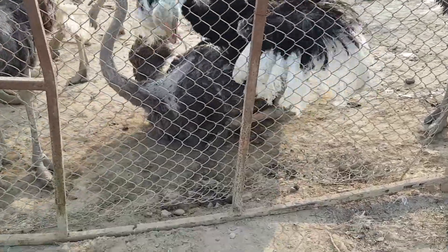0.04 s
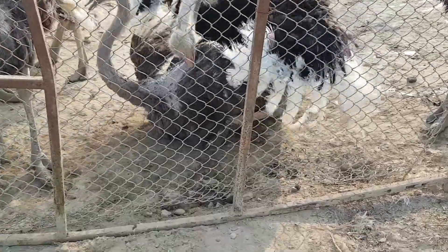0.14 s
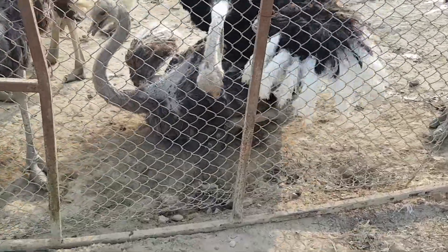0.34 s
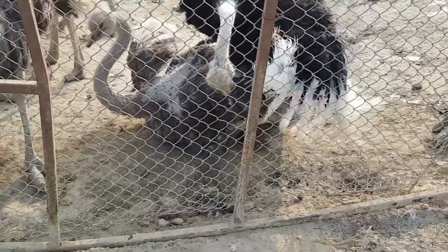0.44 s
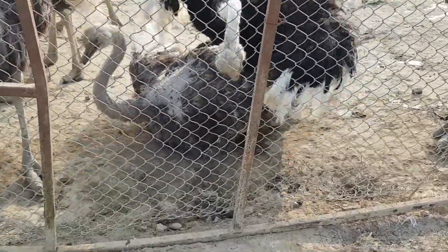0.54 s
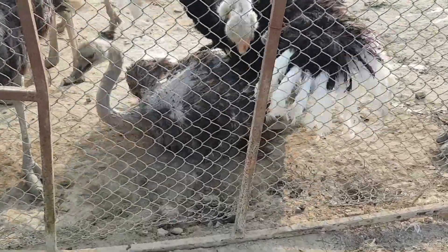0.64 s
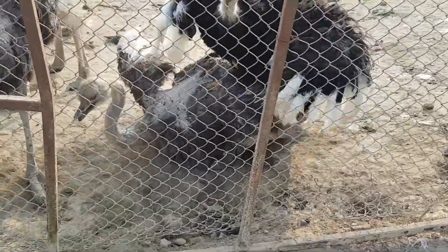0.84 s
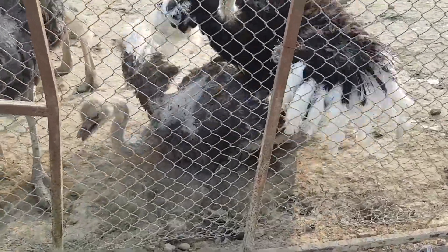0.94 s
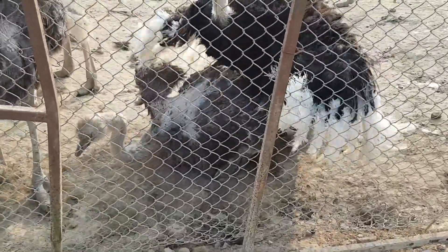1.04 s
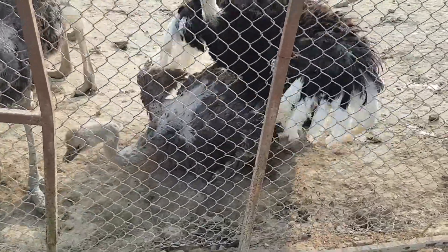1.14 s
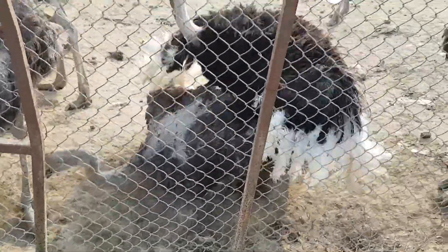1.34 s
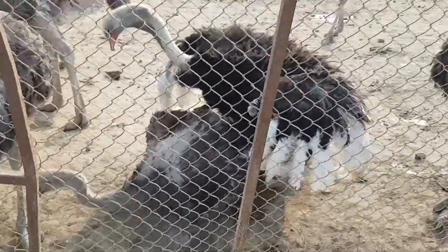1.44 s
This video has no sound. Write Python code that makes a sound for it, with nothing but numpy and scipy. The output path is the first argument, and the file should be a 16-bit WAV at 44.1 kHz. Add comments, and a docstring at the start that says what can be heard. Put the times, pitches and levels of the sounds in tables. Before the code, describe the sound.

Close by in an outdoor pen, an ostrich lets out a single deep, raspy groan that rises slightly, then falls away. Light rustles and scuffs follow, with soft, evenly spaced knocks and a far rumble and hiss throughout.

```python
"""An ostrich gives one low groan in a dry outdoor pen, close to a stereo pair of microphones.
Slow pulses from a valve in its throat boom in the inflated neck, each with a short rasp, and sink to a
slack rattle as the air runs out. Dull knocks repeat evenly, feathers rustle to the right, and feet pad
and scuff on the dry dirt. A steady far rumble, drone and hiss lie underneath."""
import sys
import numpy as np
from scipy import signal
from scipy.fft import rfft, irfft
from scipy.io import wavfile
from scipy.ndimage import uniform_filter1d

SR = 44100
rng = np.random.default_rng(int(sys.argv[2]) if len(sys.argv) > 2 else 0)


def inscribe(sig):
    """Save sig as 16-bit PCM at rate SR to the path in sys.argv[1].

    A 1-D sig is mono; a 2-D sig holds one channel per row.
    Samples are clipped to [-1, 1] before scaling.
    """
    pcm = np.round(np.clip(np.atleast_2d(sig).T, -1, 1) * 32767)
    wavfile.write(sys.argv[1], SR, pcm.astype(np.int16))


N = 66150
TIME = np.arange(N) / SR
FFT_SIZE = 2 * N
FREQ = np.maximum(np.arange(N + 1) * SR / FFT_SIZE, 1)

GROAN_START_S, GROAN_END_S, GROAN_FADE_S = .2064, .905, .0028
# pulse rate of the throat valve: (time [s], rate [Hz])
GROAN_PITCH = [(.2, 66), (.25, 76), (.298, 83.8), (.335, 85.6), (.38, 85.7), (.415, 87.9), (.47, 88.7),
               (.504, 90.4), (.56, 85.8), (.61, 79), (.658, 70.3), (.706, 62), (.757, 55.6), (.81, 51.5),
               (.9, 45)]
# effort of the call: (time [s], boom level [dB], rasp level [dB])
GROAN_EFFORT = [(.21, -37, -51), (.25, -31.5, -48), (.31, -27, -44.5), (.39, -27, -44), (.5, -25.5, -41.5),
                (.57, -28.5, -43.5), (.63, -31, -48.5), (.69, -34, -50), (.77, -33.5, -53.5),
                (.83, -37, -65), (.89, -49, -86)]
def groan(jitter_s=.000025, spread_db=.5, echo_db=-5):
    """Near the middle of the pair, one pulse train drives the neck's boom and the throat's rasp."""
    hz = over_time(GROAN_PITCH)
    effort_times, *levels = np.transpose(GROAN_EFFORT)
    boom_db, rasp_db = [np.interp(TIME, effort_times, db) for db in levels]
    cycles = np.cumsum(hz * (TIME >= GROAN_START_S)) / SR
    turns = np.arange(np.interp(GROAN_END_S, TIME, cycles))
    late, loud = rng.standard_normal((2, 128))[:, :len(turns)]
    starts = np.maximum(np.interp(turns, cycles, TIME), GROAN_START_S) + jitter_s * late
    pulses = clicks(starts, from_db(spread_db * loud))
    neck = boom(pulses) * from_db(boom_db) * pan(-.8)
    throat = rasp(pulses, starts) * from_db(rasp_db)
    echo = from_db(echo_db) * pen_echo(highpass(throat, 1000))
    gate = np.clip(np.minimum(TIME - GROAN_START_S, GROAN_END_S - TIME) / GROAN_FADE_S, 0, 1)
    return gate * (neck + lean_right(throat + echo))


# resonances of the neck, taut and slack: (frequency [Hz], gain [dB])
TAUT_NECK_SPECTRUM = [(30, -54), (70, -7), (88, 0), (140, -4), (175, 4.5), (230, -26.5), (268, -17),
                      (320, -11.5), (355, -18), (440, -18.5), (540, -27), (900, -47.5), (3000, -105.5)]
SLACK_NECK_SPECTRUM = [(30, -56), (55, -5.5), (110, -13.5), (155, 12), (195, -5.5), (228, -4), (285, 3),
                       (350, -13.5), (450, -37.5), (640, -11.5), (850, -27), (1300, -60), (3000, -65)]
def boom(pulses, swell_at_s=.575, swell_width_s=.068, swell_hz=321, swell_db=6):
    """The inflated neck rings with each pulse; an upper resonance swells while the pitch sinks."""
    neck = taut_to_slack(pulses, TAUT_NECK_SPECTRUM, SLACK_NECK_SPECTRUM)
    swell = from_db(swell_db) * np.exp(-((TIME - swell_at_s) / swell_width_s) ** 2)
    upper = signal.lfilter(*signal.iirpeak(swell_hz, Q=2.4, fs=SR), neck)
    return evened(neck + swell * upper)


# the valve opens, flutters, slaps shut and bounces: (delay before sag [cycles], level [dB])
VALVE_SLAPS = [(0, -2), (.14, -8), (.187, 0), (.29, -9)]
# colour of the rasp, neck taut and slack: (frequency [Hz], gain [dB])
TAUT_RASP_SPECTRUM = [(200, -64), (470, -1), (600, 5), (730, 6.5), (870, 5.5), (1020, 9), (1220, 0.5),
                      (1450, 2.5), (1820, 3), (2100, 1), (2400, -5.5), (2850, -3.5), (3100, -18),
                      (3600, -12.5), (4400, -19.5), (5400, -34), (12000, -44)]
SLACK_RASP_SPECTRUM = [(200, -37), (470, -11), (640, 12.5), (1000, 1), (1350, 0), (1850, 5), (2500, -3.5),
                       (3400, -23), (6000, -30), (12000, -43)]
SAG_FROM_S, SAG_S, SAG_SHARE = .51, .12, .14
SLAP_JITTER_S, SLACK_JITTER_S, SLAP_SPREAD_DB, SLAP_WANDER = .000015, .00025, 1.5, .012
def rasp(pulses, starts, air_db=-11, slack_air_db=10, air_decay_s=.004):
    """Uneven slaps and a bright puff of air in each cycle, looser and breathier as the neck slackens."""
    # past the peak the valve stays open longer in each cycle, so the rasp's resonances sink
    sag = 1 + SAG_SHARE * np.clip((starts - SAG_FROM_S) / SAG_S, 0, 1)
    span_s = sag / np.interp(starts, *np.transpose(GROAN_PITCH))
    jitter_s = SLAP_JITTER_S + SLACK_JITTER_S * slackness(starts)
    slaps = 0
    for share, db in VALVE_SLAPS:
        late, loud, slow = rng.standard_normal((3, 128))[:, :len(starts)]
        wander = SLAP_WANDER * rms_one(uniform_filter1d(slow, size=9))
        times = starts + share * (1 + wander) * span_s + jitter_s * late
        slaps = slaps + clicks(times, from_db(db + SLAP_SPREAD_DB * loud))
    puffs = signal.lfilter([1], [1, -np.exp(-1 / (air_decay_s * SR))], pulses)
    air = rms_one(highpass(puffs * rng.standard_normal(N), 1400))
    source = rms_one(slaps) + air * from_db(air_db + slack_air_db * slackness(TIME))
    return evened(taut_to_slack(source, TAUT_RASP_SPECTRUM, SLACK_RASP_SPECTRUM))


def slackness(t, from_s=.647, by_s=.701):
    """0 while the neck is taut, 1 once it is slack."""
    return np.clip((t - from_s) / (by_s - from_s), 0, 1)


def taut_to_slack(x, taut_spectrum, slack_spectrum):
    """The taut neck's colour fades into the slack neck's."""
    slack = slackness(TIME)
    return (1 - slack) * evened(colour(x, taut_spectrum)) + slack * evened(colour(x, slack_spectrum))


def pen_echo(x, t60_s=.08):
    """Short scatter from the ground, fence and birds reaches both microphones."""
    tail = stereo_noise() * from_db(-60 * TIME / t60_s)
    return signal.fftconvolve(x[None], rms_one(tail) / np.sqrt(N), axes=1)[:, :N]


# dull blows: (time [s], level [dB], brightness [dB per octave])
KNOCK_BLOWS = [(0.1748, -33, -3.5), (0.4615, -31, 0.5), (0.7569, -31, -0.5), (1.0451, -32, 0),
               (1.3236, -31, 1)]
# modes of the struck body: (frequency [Hz], gain [dB], t60 [s])
BODY_MODES = [(125, -12, 0.058), (363, -1.5, 0.034), (637, 2, 0.018), (748, -1, 0.029)]
def knocks(ping_db=-26):
    """Soft blows on a hollow, heavily damped body, each leaving a faint high ring."""
    times, db, brightness = np.transpose(KNOCK_BLOWS)
    body = 0
    for hz, mode_db, t60_s in BODY_MODES:
        tilt_db = brightness * np.log2(hz / BODY_MODES[1][0])
        body = body + ring(clicks(times, from_db(db + mode_db + tilt_db)), hz, t60_s)
    ping = ring(clicks(times, from_db(db + ping_db)), hz=4460, t60_s=.066)
    return (lowpass(body, 800, order=4) + ping) * pan(-1.5)


# steps in the pen: (time [s], level [dB], pitch [Hz])
FOOTFALLS = [(.016, -40.5, 284), (0.095, -40, 315), (0.179, -30.5, 189), (.922, -44, 570),
             (1.229, -38.5, 277), (1.358, -42, 196)]
def footfalls():
    """Padded feet press on the dirt, each with a short low ring, alike in both microphones."""
    steps = sum(ring(clicks([s], from_db(db)), hz, t60_s=.037) for s, db, hz in FOOTFALLS)
    return lowpass(steps, 600)


# strokes of feathers: (peak time [s], rise [s], fall [s], level [dB])
FEATHER_STROKES = [(.26, 0.073, 0.13, -60.5), (.64, 0.09, 0.04, -56.5), (1.235, 0.057, 0.053, -53),
                   (1.26, 0.0092, 0.01, -63), (1.42, 0.16, 0.15, -57.5)]
# their colour: (frequency [Hz], gain [dB])
FEATHER_SPECTRUM = [(500, -21), (1400, -0.5), (2600, -5), (4000, -1.5), (5500, -6.5), (7800, -10.5),
                    (9300, -27.5), (13000, -21.5), (16000, -27.5)]
def feathers():
    """Feathers rub over each other in soft rustles."""
    return friction(FEATHER_STROKES, FEATHER_SPECTRUM)


# dry snaps: (time [s], level [dB])
SNAPS = [(1.088, -48), (1.178, -37.5)]
# their colour: (frequency [Hz], gain [dB])
SNAP_SPECTRUM = [(200, -13), (1500, 19), (5000, 13.5), (8000, -18), (15000, -15)]
def ticks(decay_s=.00095):
    """Small dry snaps, each a very short burst of noise."""
    level = sum(from_db(db) * (TIME >= s) * np.exp(-np.abs(TIME - s) / decay_s) for s, db in SNAPS)
    return level * rms_one(colour(stereo_noise(), SNAP_SPECTRUM))


# sprays and scuffs on the pen floor: (peak time [s], rise [s], fall [s], level [dB])
GRIT_SPRAYS = [(.64, 0.088, 0.048, -65.5), (.825, 0.0079, 0.022, -63), (.924, .002, 0.0027, -58),
               (1.3, 0.039, 0.15, -61.5), (1.365, 0.018, 0.011, -61), (1.48, 0.086, .06, -65)]
DIRT_SCUFFS = [(.195, 0.018, 0.022, -48), (.945, 0.014, 0.018, -51), (1.087, 0.014, 0.0042, -51.5),
               (1.235, 0.013, 0.012, -60.5), (1.358, 0.011, 0.012, -62), (1.4, 0.13, 0.095, -55)]
# their colours: (frequency [Hz], gain [dB])
GRIT_SPECTRUM = [(3000, -22), (7000, -9), (10000, -4.5), (13000, 0.5), (16000, 1)]
DIRT_SPECTRUM = [(50, -12), (100, -8), (300, 8), (500, 8), (1300, 1), (2100, 1.5), (2800, -5.5),
                 (6000, -37)]
def dry_ground():
    """Fine grit sprays with a hiss, and scuffed dirt scrapes lower down."""
    return friction(GRIT_SPRAYS, GRIT_SPECTRUM) + friction(DIRT_SCUFFS, DIRT_SPECTRUM)


def friction(strokes, spectrum, grains_per_s=9000, spread_db=.5):
    """Dense tiny contacts that swell and fade with each stroke."""
    sizes = from_db(spread_db * np.minimum(rng.exponential(1, (2, N)), 6))
    signs = rng.choice([-1, 1], (2, N))
    grains = sizes * signs * (rng.random((2, N)) < grains_per_s / SR)
    level = sum(from_db(db) * np.exp(-((TIME - s) / np.where(TIME < s, rise, fall)) ** 2)
                for s, rise, fall, db in strokes)
    return level * rms_one(colour(microphone_pair(grains), spectrum))


# far noise around the pen: (frequency [Hz], gain [dB])
OUTDOOR_SPECTRUM = [(15, -45), (32, -38.5), (45, 11.5), (62, -17.5), (90, 3), (130, -5.5), (195, -1.5),
                    (290, -8), (400, -15), (680, -14), (1000, -17), (1400, -16.5), (2200, -15),
                    (3100, -23.5), (4200, -26), (5600, -33), (7700, -23), (9200, -42.5), (13000, -39),
                    (16000, -40.5)]
# its strength at the microphones: (time [s], level [dB])
OUTDOOR_LEVEL = [(0, -46), (.15, -46.5), (.88, -46), (1.0, -48), (1.14, -47.5), (1.25, -46), (1.5, -46)]
def background(drone_hz=45.7, waver_hz=.86, drone_db=-57.5):
    """Far outdoor rumble and hiss, brighter on the right, over a low wavering drone."""
    noise = rms_one(lean_right(colour(stereo_noise(), OUTDOOR_SPECTRUM)))
    waver = np.interp(TIME, np.linspace(0, N / SR, num=10), rng.standard_normal(10))
    drone = rms_one(np.sin(2 * np.pi * np.cumsum(drone_hz + waver_hz * waver) / SR))
    return noise * from_db(over_time(OUTDOOR_LEVEL)) + from_db(drone_db) * drone


# how alike the two microphones sound: (frequency [Hz], likeness [ratio, capped at 1])
MIC_LIKENESS = [(100, 1), (400, 0.5), (900, 1.1), (2000, 0.7), (4000, 0.26)]
def microphone_pair(pair):
    """Mix two unrelated signals so that they are alike in the bass and apart in the treble."""
    alike = np.clip(over_hz(MIC_LIKENESS), 0, 1)
    mid, side = rfft(pair, FFT_SIZE)
    return irfft(np.sqrt(1 + alike) * mid + np.sqrt(1 - alike) * side * [[1], [-1]])[:, :N]


def stereo_noise():
    """White noise across both microphones."""
    return microphone_pair(rng.standard_normal((2, N)))


# balance of the microphones: (frequency [Hz], left minus right [dB])
MIC_BALANCE = [(100, 0.5), (1000, -2.1), (2500, -3.5), (4500, -3.5), (8000, -7.5), (12000, 2)]
def lean_right(pair):
    """Most of the treble is louder in the right microphone."""
    return irfft(rfft(pair, FFT_SIZE) * from_db(over_hz(MIC_BALANCE) / 2 * [[1], [-1]]))[:, :N]


def from_left(pair, delay_s=.00021):
    """The sound reaches the right microphone a little later."""
    return np.array([pair[0], np.interp(TIME - delay_s, TIME, pair[1])])


def pan(db):
    """Microphone gains for a level difference, left minus right."""
    return from_db([[db / 2], [-db / 2]])


def from_db(db):
    """Decibels to gain."""
    return 10 ** (np.asarray(db) / 20)


def rms_one(x):
    """Scale to rms 1."""
    return x / np.sqrt(np.mean(x ** 2) + 1e-20)


def evened(x):
    """Hold the level at rms 1 over a few pulses."""
    power = x ** 2
    for _ in range(3):
        power = uniform_filter1d(power, size=1100)
    return x / np.sqrt(np.abs(power) + power.max() / 1000)


def over_time(points):
    """Read a table of (time [s], value) at every sample."""
    return np.interp(TIME, *np.transpose(points))


def over_hz(points):
    """Read a table of (frequency [Hz], value) at every frequency."""
    hz, value = np.transpose(points)
    return np.interp(np.log(FREQ), np.log(hz), value)


def colour(x, spectrum):
    """Causal (minimum-phase) filter with the given spectrum."""
    cepstrum = irfft(np.log(from_db(over_hz(spectrum))))
    cepstrum[1:N] *= 2
    cepstrum[N + 1:] = 0
    return irfft(rfft(x, FFT_SIZE) * np.exp(rfft(cepstrum)))[..., :N]


def clicks(times, gains):
    """Impulses at the given times, shared between neighbouring samples."""
    out, at = np.zeros(N), np.clip(np.asarray(times) * SR, 0, N - 2)
    np.add.at(out, at.astype(int), gains * (1 - at % 1))
    np.add.at(out, at.astype(int) + 1, gains * (at % 1))
    return out


def ring(x, hz, t60_s):
    """A unit click sets a sine of height 1 ringing."""
    radius, angle = from_db(-60 / (t60_s * SR)), 2 * np.pi * hz / SR
    return signal.lfilter([0, np.sin(angle)], [1, -2 * radius * np.cos(angle), radius ** 2], x + 1e-18)


def highpass(x, hz):
    """Keep the treble."""
    return signal.sosfilt(signal.butter(2, hz, "high", fs=SR, output="sos"), x)


def lowpass(x, hz, order=2):
    """Keep the bass."""
    return signal.sosfilt(signal.butter(order, hz, fs=SR, output="sos"), x)


def scene():
    """The groan in front, the birds' movements around it; knocks and far noise arrive left first."""
    on_right = (feathers() + ticks()) * pan(-8.5)
    underfoot = dry_ground() + footfalls()
    left_first = from_left(background() + knocks())
    return groan() + on_right + underfoot + left_first


def record(dry, cutoff_hz=15750):
    """Both channels lose the very top in a steep cut."""
    return irfft(rfft(dry, FFT_SIZE) / np.sqrt(1 + (FREQ / cutoff_hz) ** 400))[:, :N]


dry = scene()
out = record(dry)
inscribe(out)
```